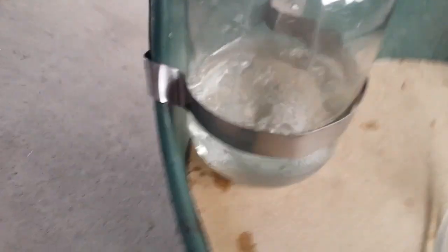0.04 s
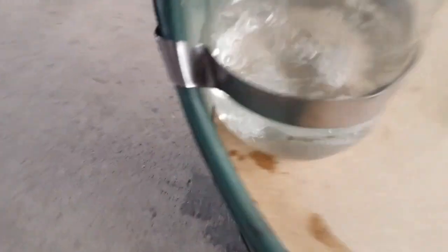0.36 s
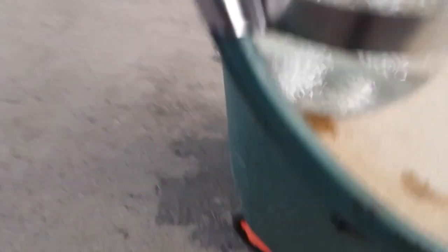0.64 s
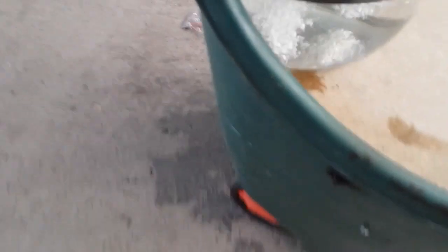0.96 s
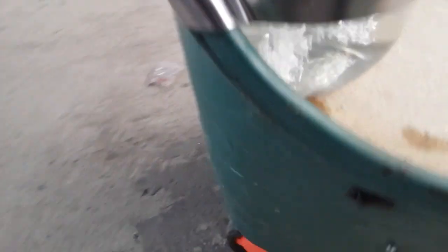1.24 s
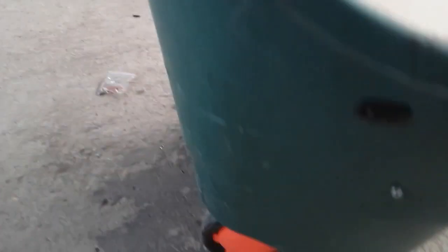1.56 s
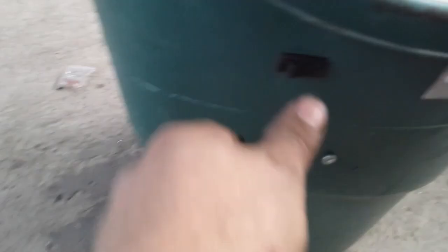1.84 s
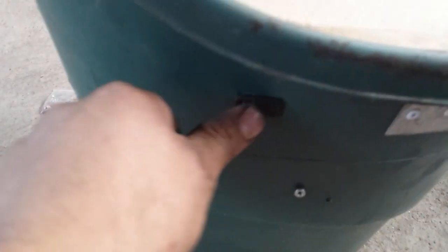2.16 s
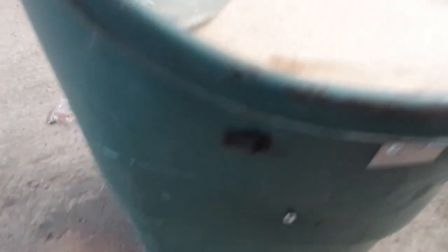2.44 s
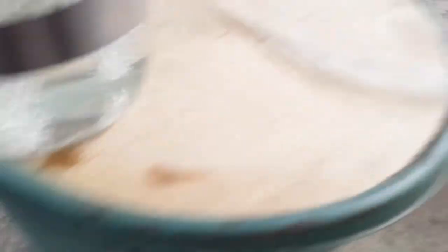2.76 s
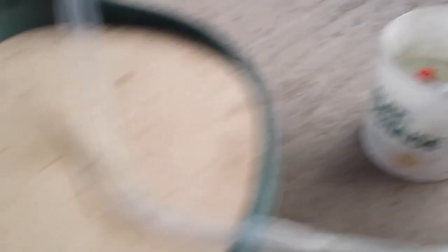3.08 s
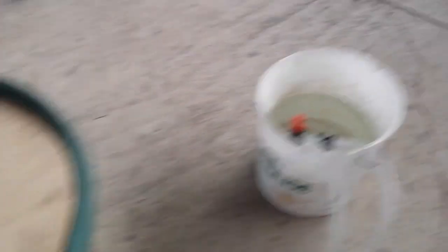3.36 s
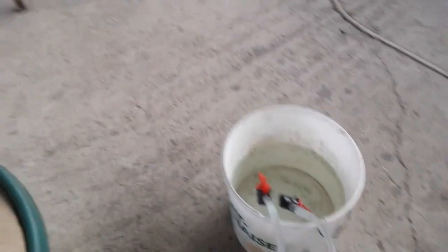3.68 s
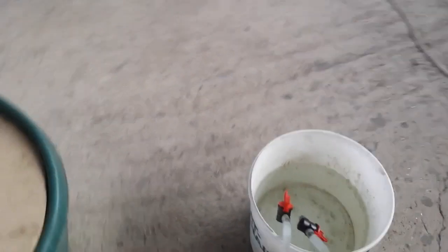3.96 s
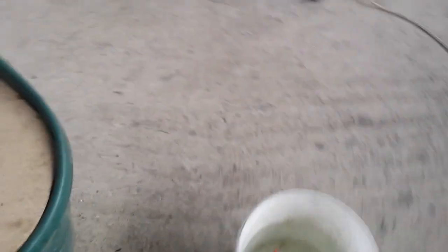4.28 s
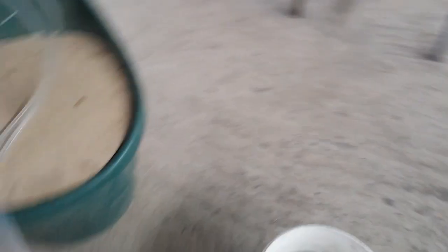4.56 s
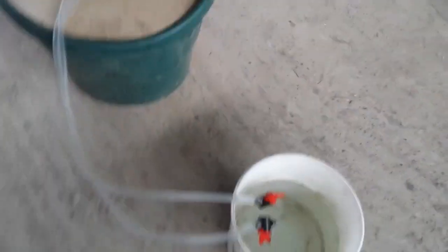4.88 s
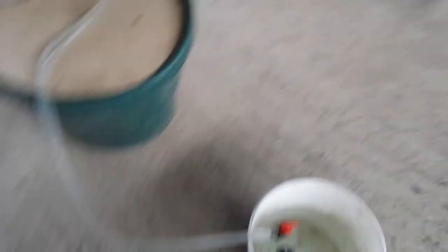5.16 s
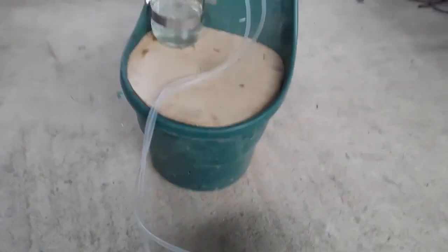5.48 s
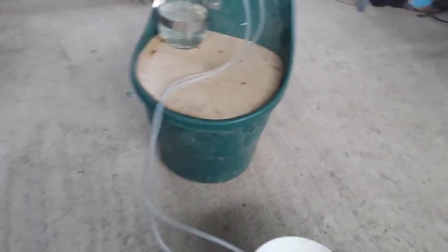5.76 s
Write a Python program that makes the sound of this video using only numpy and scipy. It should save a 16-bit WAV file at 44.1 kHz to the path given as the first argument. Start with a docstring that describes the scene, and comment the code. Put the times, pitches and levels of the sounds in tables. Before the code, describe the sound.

Steady buzzing pump motor with bubbling water, then a switch click, a quick wind-down, and soft handling noise and shoe scuffs.

```python
"""A small mains-driven pump hums and buzzes in a plastic tub on a concrete floor, churning water in a glass
flask; the tone shifts as the microphone moves from flask to switch. A thumb finds the rocker and,
at 2.3 s, clicks it off. The rotor rattles down, the hum dies away and the water settles with a few
ticks. Then quiet room tone: shoes scuff, clothes rustle and fingers bump the hand-held microphone."""
import sys
import numpy as np
from scipy import signal
from scipy.fft import rfft, irfft
from scipy.io import wavfile
from scipy.ndimage import uniform_filter1d

SR = 44100
rng = np.random.default_rng(int(sys.argv[2]) if len(sys.argv) > 2 else 0)


def wav_out(sig):
    """Save sig, one row per channel (or a flat mono array), as 16-bit PCM at SR to the path in sys.argv[1]."""
    wavfile.write(sys.argv[1], SR, np.round(np.clip(np.atleast_2d(sig).T, -1, 1) * 32767).astype(np.int16))


N = 256662
TIME = np.arange(N) / SR
FREQS = np.maximum(np.arange(N // 2 + 1) * SR / N, 1)

MAINS_HZ, OFF_S, COAST_S = 50.16, 2.318, .22   # unpowered, the rotor loses 2/3 of its speed in COAST_S
STUMBLE_S, STUMBLE_CYCLES = 1.783, .155   # the beat stumbles once, a fraction of a stroke early
HOLD_DB, CLOTH_DB, ROOM_DB = -64.5, -70, -59.5   # beds: hand on the case, faint rustle, room tone
PORT_LAG_S, CUTOFF_HZ = .0001, 15750

# pump fader rides, before trims: t/s, hum/dB, buzz/dB, hiss/dB, water/dB
PUMP_FADERS = [(0.03, -32, -48.5, -56, -41.5), (0.068, -32.5, -44.5, -55, -44.5),
               (0.468, -33, -47, -54, -45), (0.588, -32, -42.5, -54.5, -41), (1.31, -33, -45.5, -55, -42.5),
               (1.696, -30.5, -43.5, -55.5, -41), (1.98, -30.5, -42, -57, -38.5)]
# microphone move: t/s, place (0 above the flask, 1 beside the switch)
MIC_PATH = [(0, 0), (.5, 0), (.9, 0.81), (1.3, 0.48), (1.55, 1), (2.3, 0.88)]
# hum at those two places: harmonic of the stroke rate, relative level/dB
HUM_AT_FLASK = [(1, -11), (2, -21), (3, -6.5), (4, -3), (5, 1), (6, 2), (7, -4), (8, -8.5), (9, -30),
                (10, -4), (11, -3), (12, -22), (13, -43), (14, -9.5), (15, -20), (16, -38), (17, -25),
                (18, -14.5), (19, -13.5), (20, -16.5), (21, -17), (22, -13)]
HUM_AT_SWITCH = [(1, -13), (2, -5.5), (3, -4), (4, -33), (5, -2.5), (6, 2.5), (7, -7.5), (8, -5), (9, -17),
                 (10, -9), (11, -6.5), (12, -14.5), (13, -12), (14, -27), (15, -20.5), (16, -11.5),
                 (17, -19), (18, -17), (19, -15.5), (20, -22), (21, -12), (22, -17.5)]
# tub resonances: f/Hz, width/Hz
TUB_MODES = [(285, 110), (530, 39), (1080, 120)]
# housing whine: harmonic, level at the flask/dB, level at the switch/dB
WHINE_PARTIALS = [(40, -71, -68), (46, -64.5, -85), (47, -86, -62), (49, -84, -54), (50, -68, -56),
                  (51, -60, -59.5), (52, -63, -59), (56, -57, -81), (60, -64, -83), (62, -84, -66)]
# EQ of the housing's buzz at both places, the air hiss and the stalling rattle: f/Hz, level/dB
FLASK_BUZZ_EQ = [(1020, -35), (1150, 3.5), (1270, -7.5), (1400, 4), (1650, -3.5), (1780, -9), (1950, -25),
                 (2130, -3.5), (2300, -2), (2420, -19), (2600, -10), (2750, -24), (3050, -10), (3350, -30),
                 (3950, -13), (4600, -31)]
SWITCH_BUZZ_EQ = [(1020, -9), (1200, 2), (1400, -1), (1620, -0.5), (1780, -15.5), (2020, 0.5), (2170, -13),
                  (2330, -4), (2520, 0), (2700, -7), (2810, -10), (2920, -11.5), (3120, -0.5), (3350, -27),
                  (4050, -15), (4600, -34)]
HISS_EQ = [(900, -25), (1600, -12), (2600, 1.5), (3400, -3), (4300, -7), (4900, -1.5), (5300, -3.5),
           (5750, 2), (6200, 2), (6900, -3.5), (8500, -16.5), (10000, -16.5), (12000, -27), (15500, -33)]
STALL_EQ = [(100, -6), (170, 2), (300, -9), (560, 7), (750, -24), (1080, 3), (1250, -5), (1800, -13),
            (2050, -5), (2500, -20), (3000, -32), (6000, -50)]
# EQ of water churning and running back: f/Hz, level/dB
CHURN_EQ = [(25, -20), (70, -6), (115, 2), (170, -1.5), (270, -1.5), (400, -0.5), (560, -0.5), (750, -4),
            (1100, -7.5), (1600, -10.5), (2600, -15.5), (5000, -33.5)]
BACKFLOW_EQ = [(50, -14), (100, -6), (250, 2.5), (450, 2), (750, -7.5), (1100, -12), (2200, -15),
               (3500, -24), (5500, -17), (8000, -33), (15000, -42)]
# spurts in the flask: t/s, level/dB, f/Hz, width/octaves, half length/s
SPURTS = [(0.255, -50.5, 5600, 0.34, 0.009), (0.955, -45.5, 4200, 1.1, 0.012), (1.10, -54, 5200, .8, 0.041),
          (1.16, -45.5, 1700, 0.5, 0.013), (1.337, -54.5, 8000, 1.5, 0.014), (1.385, -50, 2300, .3, 0.012),
          (1.63, -57, 5950, 1.2, 0.0075), (2.427, -52.5, 4800, 0.41, 0.009)]
# rocker hits: t/s, relative level/dB, pitch ratio
ROCKER_HITS = [(2.0099, -9, 0.69), (2.3156, -9, 0.93), (2.3171, -10, 0.97), (2.3208, -20, 0.94)]
# ring of the rocker and of the microphone case at pitch ratio 1: f/Hz, level/dB, t60/s
ROCKER_MODES = [(1400, -16.5, 0.032), (2420, -14, 0.015), (3800, -10, .008), (4660, -7, 0.013),
                (5150, -11, 0.009), (6160, -6.5, 0.012), (6830, -10.5, 0.0058), (8500, -16.5, 0.0058),
                (11100, -21, 0.0073), (13300, -38, 0.0044)]
TAP_MODES = [(547, -9, 0.025), (1700, -4, 0.0099), (3200, -13, .003), (5600, -15, 0.0024)]
# tub knocks, footfalls, fingers on the case: t/s, level/dB, f/Hz, t60/s, left-right/dB, tap over thud/dB
BUMP_CUES = [(1.786, -20, 110, 0.024, -15, -33), (2.345, -25.5, 532, 0.037, -8, -6),
             (2.41, -35, 75, .2, -8, -40), (3.328, -44.5, 430, .04, -8, -18),
             (3.5292, -20, 180, 0.0095, 26, -23.5), (3.899, -41, 228, 0.023, -6, -15),
             (4.651, -31.5, 258, 0.0099, -9, -15), (5.1922, -39, 188, 0.01, 29, 10.5)]
# ticks of water, hose and grit: t/s, peak before trim/dB, f/Hz, width/octaves
TICK_CUES = [(2.616, -42, 1660, 0.65), (2.6571, -34.5, 2200, 1.7), (2.703, -42, 5600, 0.62),
             (2.749, -38, 5600, 0.5), (2.7613, -36.5, 5400, 0.62), (2.8558, -38, 2100, 2.6),
             (2.887, -35.5, 1700, 2.7), (3.204, -43.5, 2300, 0.89), (4.017, -37, 1900, 1.5),
             (4.0249, -39.5, 1700, 1.3), (4.0316, -35, 1900, 1.8), (4.0704, -42, 1760, 1),
             (4.0792, -45, 1740, 0.85), (4.694, -45, 1430, 1.9)]
# grit and cloth dragged in stepping back: t/s, level/dB, f/Hz, width/octaves, half length/s
SCUFF_CUES = [(4.05, -56, 1800, .9, 0.013), (4.22, -62, 2000, .7, 0.038), (4.80, -49.5, 5150, 0.53, 0.014),
              (4.80, -56, 1910, .35, 0.018), (5.17, -60.5, 1450, 0.38, 0.047),
              (5.53, -58, 5100, 0.33, 0.037)]
# grip shifts: t/s, level/dB
GRIP_CUES = [(2.755, -56), (3.05, -52), (3.239, -50), (3.37, -52.5), (3.67, -58.5), (3.91, -57.5),
             (4.03, -53), (4.14, -54), (4.52, -54), (4.77, -53.5), (5.22, -57), (5.57, -57.5)]
# cloth sweeps of arm or leg: t/s at the fastest moment, level/dB, rise/s, fall/s
CLOTH_CUES = [(2.755, -59, 0.097, 0.099), (3.15, -65, 0.2, 0.22), (3.91, -59.5, .07, 0.13),
              (4.03, -56, 0.011, .07), (4.225, -52.5, 0.14, .1), (4.795, -52.5, 0.052, 0.074),
              (5.32, -59.5, 0.18, 0.15), (5.53, -59, 0.049, 0.078)]
# EQ of handling rumble, cloth rustle and room tone: f/Hz, level/dB
RUMBLE_EQ = [(30, -32), (60, -14.5), (110, -14.5), (145, -4.5), (175, 3.5), (220, -2.5), (290, -10.5),
             (420, -17), (650, -17.5), (1000, -33.5), (2000, -57)]
RUSTLE_EQ = [(350, -25), (600, 0.5), (1030, -5), (1580, -3.5), (2250, -7), (2470, -5.5), (3070, -6),
             (3610, -8), (5510, -3), (8400, -18.5), (13300, -20), (15500, -23)]
ROOM_EQ = [(15, -43), (25, -28), (49, -11.5), (107, -9), (188, 0.5), (289, -10.5), (684, -13), (1240, -22),
           (1380, -18), (1490, -22.5), (3090, -22.5), (5140, -21.5), (8350, -30.5), (14300, -37.5),
           (15500, -36)]
# balance of the two microphone ports for pump and room: f/Hz, left-right/dB
PUMP_PAN = [(60, -4), (99, -15), (160, -6.5), (270, -7.0), (450, -9), (740, -8.5), (1220, -8.5), (2010, -9),
            (3330, -10.5), (5500, -21), (9080, -10), (15000, -10.0)]
ROOM_PAN = [(60, -2), (130, -7), (290, -7.5), (640, -7.5), (1410, -5.5), (3100, -7.5), (6820, -18),
            (15000, -4)]
# how alike the ports sound: f/Hz, correlation
PORT_CORRELATION = [(50, 0.84), (500, 0.8), (1000, 0.46), (2000, 0.24), (4000, 0.11), (12000, 0.046)]


def pump(hum_trim_db, buzz_trim_db, hiss_trim_db, water_trim_db):
    """The lead sound: hum, buzz and whine, a puff of air on each stroke, and the water it stirs."""
    hum_db, buzz_db, hiss_db, water_db = automation(PUMP_FADERS)
    place, strokes = np.clip(automation(MIC_PATH)[0], 0, 1), stroke_count()
    tone = from_db(hum_db + hum_trim_db) * hum(strokes, place, scatter=0.25, waver_db=1.0)
    beat = knocks(strokes, ring_cycles=.8, unrest=.15)
    facing = place ** 2   # treble is beamed, so it crossfades later than the hum
    housing = (1 - facing) * colour(beat, FLASK_BUZZ_EQ) + facing * colour(beat, SWITCH_BUZZ_EQ)
    buzz = from_db(buzz_db + buzz_trim_db) * housing + whine(strokes, facing, waver_db=1.5)
    air_gain = from_db(hiss_db + hiss_trim_db + 1.25 * drift(8.0))
    air = air_gain * colour(knocks(strokes, ring_cycles=0.87, unrest=1.3), HISS_EQ)
    water = from_db(water_db + water_trim_db + drift(7.2)) * churn(per_s=1200, ring_cycles=12.6)
    return tone * run_out(0.39) + buzz * run_out(0.49) + air * run_out(0.71) + water * run_out(0.97)


def stroke_count():
    """Strokes made so far: locked to the mains, then slowing as the rotor coasts."""
    speed = MAINS_HZ * np.exp(-np.maximum(TIME - OFF_S, 0) / COAST_S)
    stumble = STUMBLE_CYCLES * np.clip((TIME - STUMBLE_S) / 0.0053, 0, 1)
    return .5 + np.cumsum(speed) / SR + stumble


def hum(strokes, place, scatter, waver_db):
    """Clean stroke harmonics whose balance shifts as the microphone crosses the standing waves."""
    out = 0
    for (k, flask_db), (_, switch_db) in zip(HUM_AT_FLASK, HUM_AT_SWITCH):
        level = (1 - place) * from_db(flask_db) + place * from_db(switch_db)
        tub_lag = sum(np.arctan(2 * (k * MAINS_HZ - hz) / width) for hz, width in TUB_MODES)
        echoes = scatter * np.sqrt(k) * rng.standard_normal()   # reflections scatter the highs most
        phase = 2 * np.pi * k * (strokes - .23) - tub_lag + echoes
        out = out + level * from_db(waver_db * drift(0.66)) * np.cos(phase)
    return out / np.sqrt(uniform_filter1d(out ** 2, size=8792))   # levelled over 0.2 s


def knocks(strokes, ring_cycles, unrest):
    """Each stroke knocks the housing alike; its ring slowly morphs with the listening place."""
    age, out = strokes % 1, 0
    for centre in np.linspace(0, OFF_S, 4):
        patterns = rms_one(irfft(np.exp(2j * np.pi * rng.random((2, 441)))))   # flat-spectrum loops
        looped = np.array([np.interp(age, np.linspace(0, 1, len(p)), p) for p in patterns])
        distance = np.clip((np.minimum(TIME, OFF_S) - centre) / (OFF_S / 3), -1, 1)
        out = out + np.cos(np.pi / 2 * distance) * looped
    return spread((out + unrest * rng.standard_normal((2, N))) * np.exp(-age / ring_cycles))


def whine(strokes, facing, waver_db):
    """A thin top layer: high harmonics on the housing's resonances ring from stroke to stroke."""
    out = 0
    for k, flask_db, switch_db in WHINE_PARTIALS:
        level = (1 - facing) * from_db(flask_db) + facing * from_db(switch_db)
        level *= from_db(waver_db * drift(2.9))
        out = out + np.sqrt(2) * level * np.sin(2 * np.pi * (k * strokes + rng.random()))
    return out


def stall(level_db, per_s, t60, ring_cycles):
    """Without its field the rotor rattles loosely in the housing, once on each slowing stroke."""
    bursts = np.exp(-(stroke_count() % 1) / ring_cycles)
    chatter = spread(bursts * grain_pair(per_s, size_db=3.0))
    rattle = colour(chatter * (TIME > OFF_S) * run_out(t60), STALL_EQ)
    return reverb(from_db(level_db) * rattle, wet_db=-15, t60=0.64)


def churn(per_s, ring_cycles):
    """A dense crowd of small bubbles rings in the flask over a wash of stirred water."""
    clicks, pitch_slot = grains(per_s, size_db=1.0), rng.integers(0, 20, N)
    bubbles = sum(ring(clicks * (pitch_slot == k), hz, t60=ring_cycles / hz) * np.sqrt(hz)
                  for k, hz in enumerate(np.geomspace(150, 2400, 20)))
    return rms_one(colour(bubbles, CHURN_EQ) + noise(CHURN_EQ))


def backflow(level_db, per_s, t60):
    """Once the pump stops, the water runs back with a fading patter."""
    patter = colour(spread(grain_pair(per_s, size_db=2.5)), BACKFLOW_EQ)
    return from_db(level_db) * patter * (TIME > OFF_S) * run_out(t60)


def switch(trim_db, crack_db, crack_t60):
    """The thumb meets the rocker; later it snaps over and its contacts bounce."""
    out, t = np.zeros(N), TIME[:4000]
    for s, db, pitch in ROCKER_HITS:
        crack = from_db(crack_db - 60 * t / crack_t60) * rng.standard_normal(len(t))
        add(out, s, from_db(db + trim_db) * (struck(ROCKER_MODES, t, pitch) + crack))
    return reverb(out, wet_db=-16.0, t60=0.25)


def bumps(low_cut_hz):
    """Soft thuds with a short tap on top, louder at the nearer port."""
    out, t = np.zeros((2, N)), TIME[:4000]
    tap = struck(TAP_MODES, t, pitch=0.92)
    for s, db, hz, t60, pan_db, tap_db in BUMP_CUES:
        thud = np.sin(2 * np.pi * hz * t) * from_db(-60 * t / t60)
        sides = from_db([[pan_db / 2], [-pan_db / 2]])
        add(out, s, from_db(db) * sides / sides.mean() * (thud + from_db(tap_db) * tap))
    return signal.sosfilt(signal.butter(2, low_cut_hz, "high", fs=SR, output="sos"), out + 1e-18)


def ticks(trim_db, t60):
    """Water, hose and grit tick: brief crackles, each around its own pitch, with the top softened."""
    out, t = np.zeros(N), TIME[:2000]
    for s, db, hz, octaves in TICK_CUES:
        tick = band_pass(rng.standard_normal(len(t)) * from_db(-60 * t / t60), hz, octaves)
        tick = signal.sosfilt(signal.butter(2, 6200, fs=SR, output="sos"), tick)
        add(out, s + 0.00104, from_db(db + trim_db) * tick / np.abs(tick).max())
    return reverb(out, wet_db=-7.5, t60=0.22)


def sprays(cues, per_s):
    """Short swells of fine grains: droplets on glass, grit under a sole."""
    out = 0
    for s, db, hz, octaves, half_s in cues:
        spray = band_pass(grain_pair(per_s, size_db=3.0) + 1e-18, hz, octaves)
        out = out + from_db(db) * rms_one(spray) * swell(s, half_s)
    return out


def handling(sway_db, sway_hz):
    """The held case rumbles hollowly and swells at each shift of the grip."""
    power = from_db(HOLD_DB + sway_db * drift(sway_hz)) ** 2
    for s, db in GRIP_CUES:
        power += (from_db(db) * swell(s, half_s=0.038)) ** 2
    rumble = noise(RUMBLE_EQ)
    levelled = rumble / np.sqrt(uniform_filter1d(np.mean(rumble ** 2, axis=0), size=2646))
    return np.sqrt(power) * levelled


def clothes(grit):
    """Cloth slides with a fine grain, building to the fastest moment of each sweep and easing off."""
    power = from_db(CLOTH_DB) ** 2
    for s, db, rise, fall in CLOTH_CUES:
        sweep = np.exp(-np.maximum((s - TIME) / rise, (TIME - s) / fall))
        power = power + (from_db(db) * sweep) ** 2
    rubbing = rng.standard_normal((2, N)) + grit * rms_one(grain_pair(per_s=900, size_db=4.5))
    return np.sqrt(power) * colour(spread(rubbing), RUSTLE_EQ)


def room_tone():
    """The still room: a dark, steady bed of noise."""
    return from_db(ROOM_DB) * noise(ROOM_EQ)


def reverb(x, wet_db, t60):
    """Direct sound plus a separate diffuse tail at each port."""
    t = TIME[:SR]
    tail = rng.standard_normal((2, SR)) * from_db(-60 * t / t60) * (1 - np.exp(-t / 0.0013))
    tail /= np.sqrt(np.sum(tail ** 2) / 2)
    return x + from_db(wet_db) * signal.fftconvolve(np.atleast_2d(x), tail, axes=1)[:, :N]


def ports(x, pan):
    """The left port faces away: quieter, duller and slightly late."""
    ratio = from_db(at_hz(pan, FREQS))
    late = np.exp(-2j * np.pi * FREQS * PORT_LAG_S)
    return irfft(rfft(x) * np.array([ratio * late, np.ones_like(ratio)]) * 2 / (1 + ratio), N)


def spread(pair):
    """Two unrelated sounds become left and right: narrow bass, wide treble."""
    alike = np.clip(at_hz(PORT_CORRELATION, FREQS), 0, 1)
    mid, side = rfft(pair)
    return irfft(np.sqrt(1 + alike) * mid + np.sqrt(1 - alike) * side * [[1], [-1]], N)


def run_out(t60):
    """Full level until the switch opens, then a fade."""
    return from_db(-60 * np.maximum(TIME - OFF_S, 0) / t60)


def swell(s, half_s):
    """Bell-shaped envelope peaking at time s."""
    return np.exp(-.5 * ((TIME - s) / half_s) ** 2)


def automation(rows):
    """Breakpoints to one curve per column."""
    s, *columns = np.transpose(rows)
    return [np.interp(TIME, s, c) for c in columns]


def drift(hz):
    """Slow random wobble; rms 1."""
    slow = irfft(rfft(rng.standard_normal(N)) / (1 + (FREQS / hz) ** 2), N)
    return rms_one(slow - slow.mean())


def noise(eq):
    """Coloured stereo noise."""
    return colour(spread(rng.standard_normal((2, N))), eq)


def grains(per_s, size_db):
    """Random clicks of uneven size."""
    sizes = from_db(size_db * np.minimum(rng.exponential(1, N), 4)) * rng.choice([-1, 1], N)
    return sizes * (rng.random(N) < per_s / SR)


def grain_pair(per_s, size_db):
    """Two unrelated tracks of grains."""
    return np.array([grains(per_s, size_db) for _ in range(2)])


def ring(clicks, hz, t60):
    """Each click sets a sine ringing."""
    r, w = from_db(-60 / (t60 * SR)), 2 * np.pi * hz / SR
    return signal.lfilter([0, np.sin(w)], [1, -2 * r * np.cos(w), r * r], clicks + 1e-18)


def struck(modes, t, pitch):
    """Modes ringing after one hit; pitched down, they also die sooner."""
    return sum((-1) ** k * from_db(db - 60 * t / (t60 * pitch ** 2)) * np.sin(2 * np.pi * hz * pitch * t)
               for k, (hz, db, t60) in enumerate(modes))


def band_pass(x, hz, octaves):
    """A gentle band around hz."""
    half = 2 ** (octaves / 2)
    edges = [hz / half, min(hz * half, SR * .45)]
    return signal.sosfilt(signal.butter(1, edges, "band", fs=SR, output="sos"), x)


def colour(x, eq):
    """Apply an EQ curve; rms 1."""
    return rms_one(irfft(rfft(x) * from_db(at_hz(eq, FREQS)), N))


def at_hz(points, hz):
    """Read a curve on a log-frequency axis."""
    knots_hz, values = np.transpose(points)
    return np.interp(np.log(hz), np.log(knots_hz), values)


def add(out, s, sound):
    """Mix a short sound in at time s."""
    at = round(s * SR)
    out[..., at:at + sound.shape[-1]] += sound[..., :N - at]


def from_db(db):
    """Decibels to gain."""
    return 10 ** (np.asarray(db) / 20)


def rms_one(x):
    """Scale to unit power."""
    return x / np.sqrt(np.mean(x ** 2) + 1e-20)


def scene():
    """Pump and switch up close, then someone moving about in the quiet room."""
    machine = pump(hum_trim_db=0.12, buzz_trim_db=-2.1, hiss_trim_db=2.2, water_trim_db=-0.47)
    machine += stall(level_db=-59.5, per_s=870, t60=0.38, ring_cycles=0.41)
    machine += sprays(SPURTS, per_s=2800)
    machine += switch(trim_db=-5.5, crack_db=-22.5, crack_t60=0.0087)
    machine += backflow(level_db=-42.5, per_s=1400, t60=1.56)
    person = handling(sway_db=4.0, sway_hz=3.5) + clothes(grit=0.43) + sprays(SCUFF_CUES, per_s=2500)
    room = room_tone() + person + ticks(trim_db=1.5, t60=0.013)
    return ports(machine, PUMP_PAN) + ports(room, ROOM_PAN) + bumps(low_cut_hz=88)


def record(dry):
    """A steep high cut on the whole mix."""
    return signal.sosfilt(signal.ellip(12, .1, 80, CUTOFF_HZ, fs=SR, output="sos"), dry)


dry = scene()
out = record(dry)
wav_out(out)
```